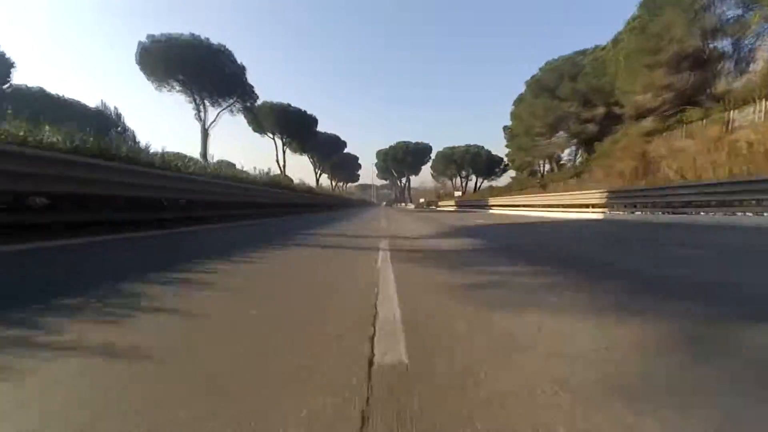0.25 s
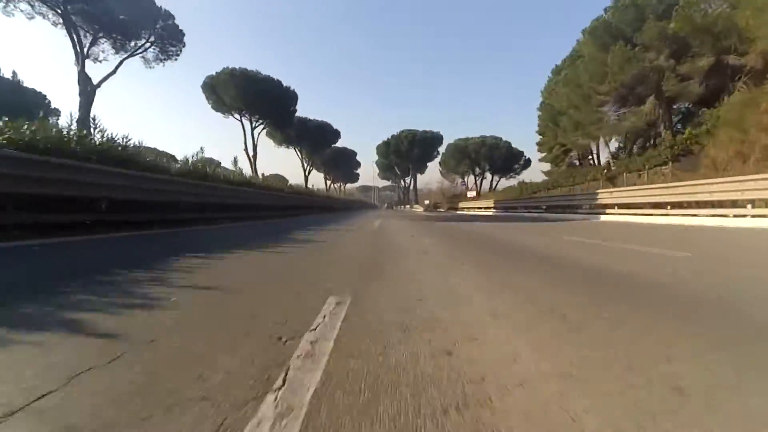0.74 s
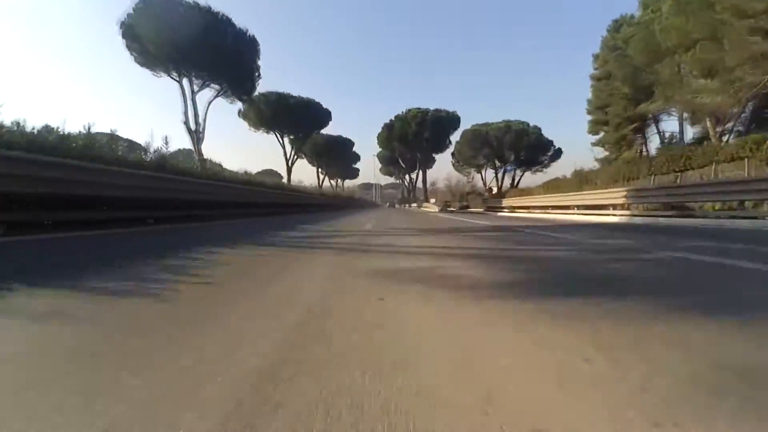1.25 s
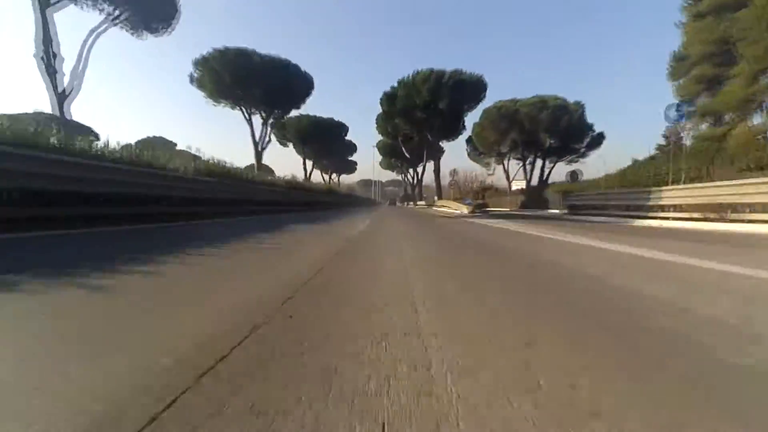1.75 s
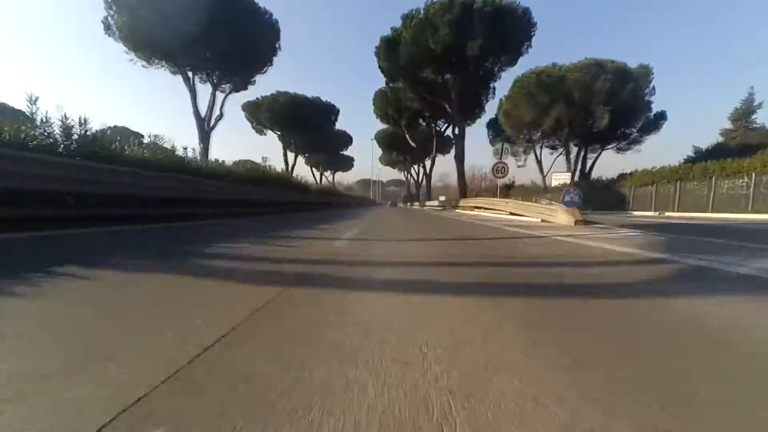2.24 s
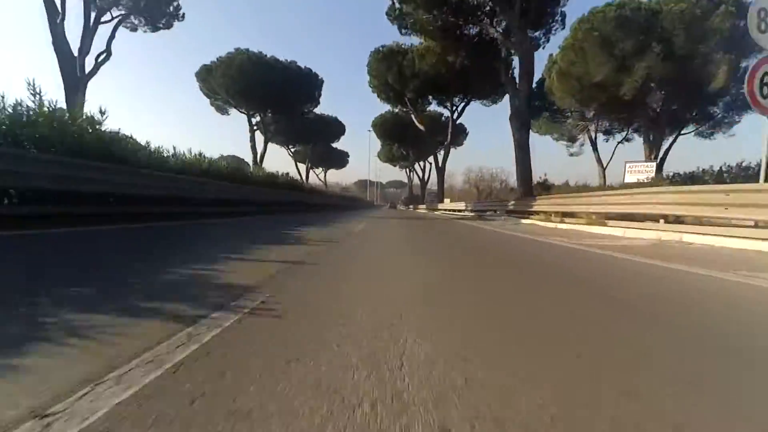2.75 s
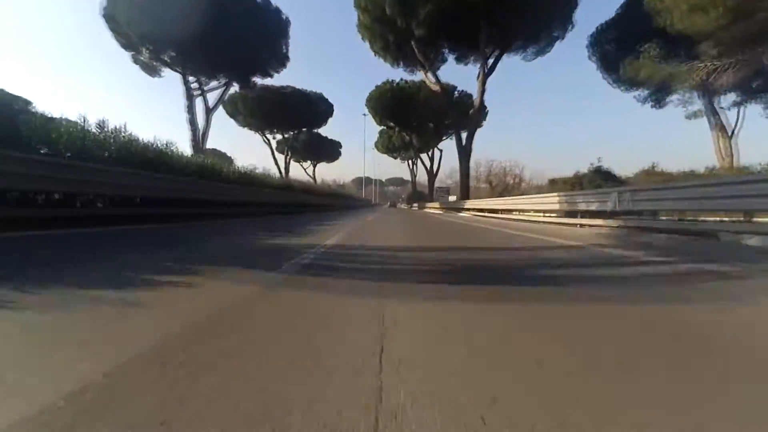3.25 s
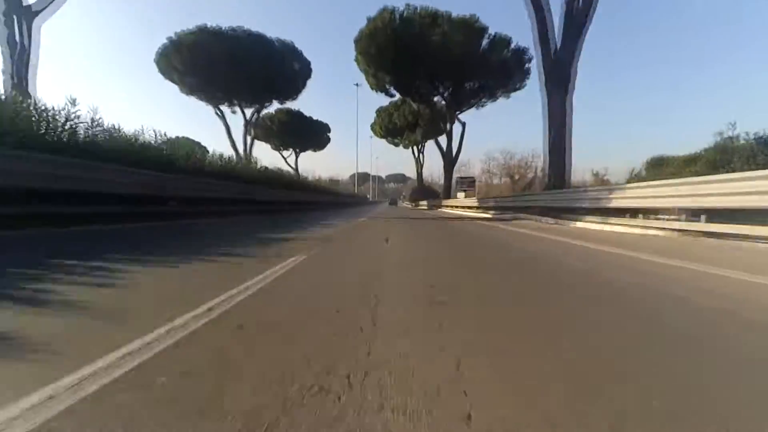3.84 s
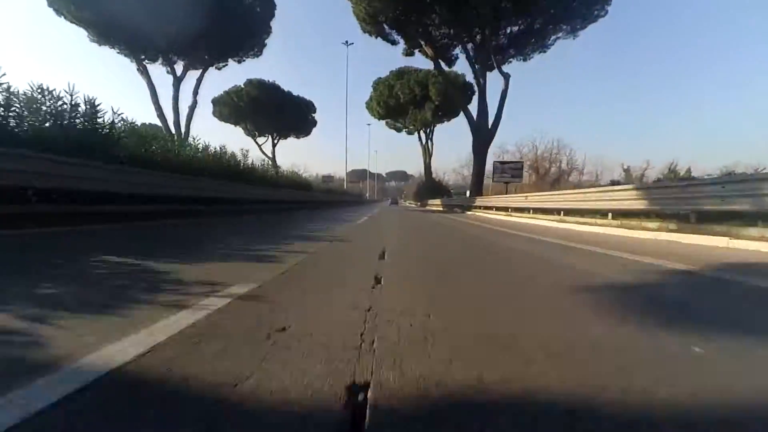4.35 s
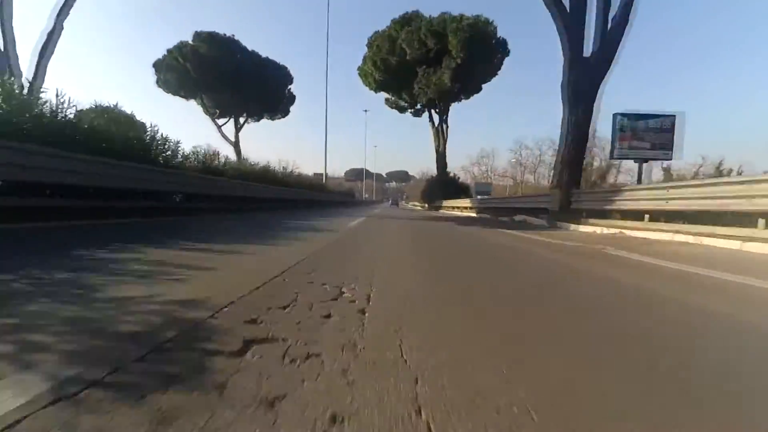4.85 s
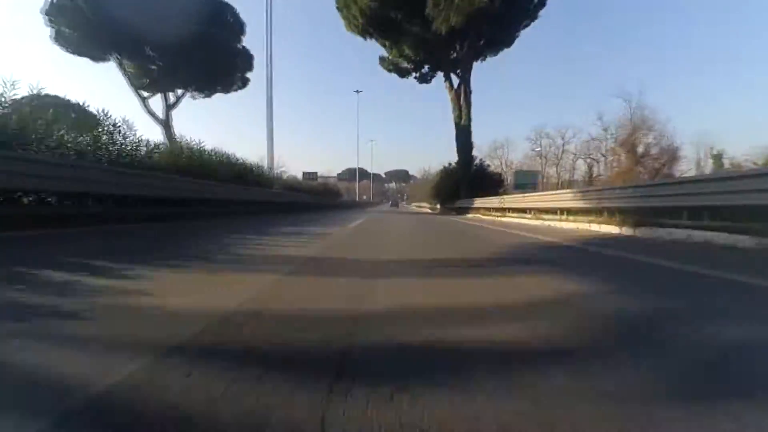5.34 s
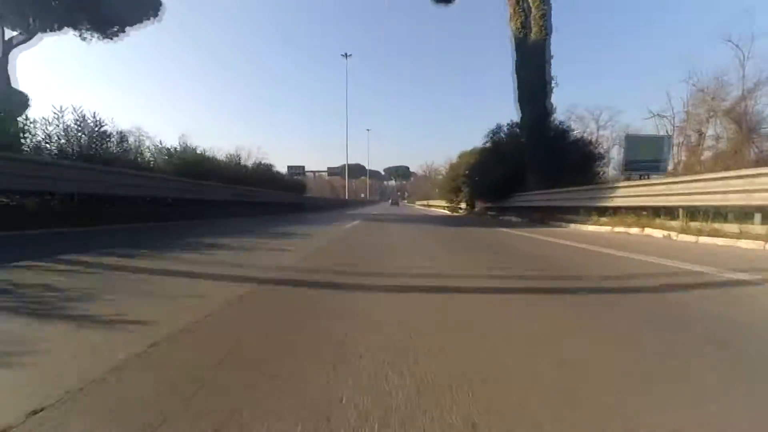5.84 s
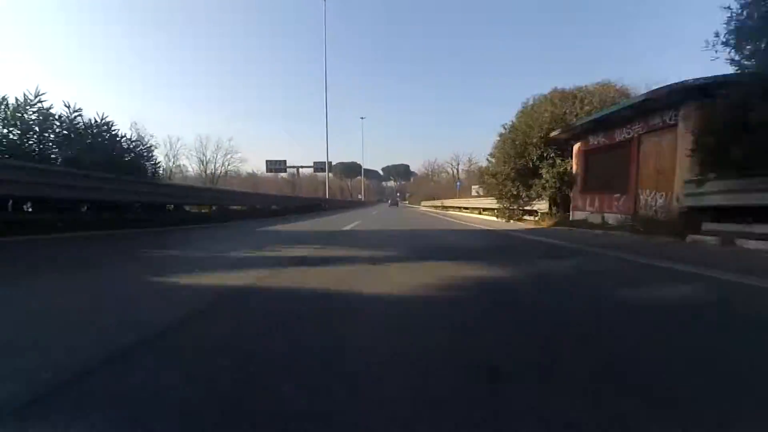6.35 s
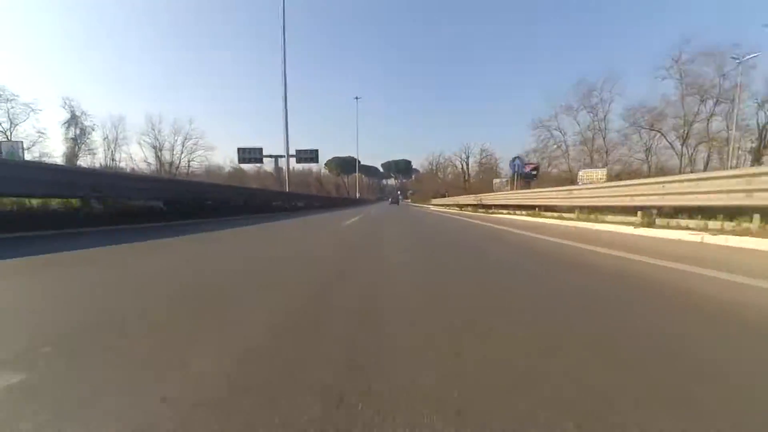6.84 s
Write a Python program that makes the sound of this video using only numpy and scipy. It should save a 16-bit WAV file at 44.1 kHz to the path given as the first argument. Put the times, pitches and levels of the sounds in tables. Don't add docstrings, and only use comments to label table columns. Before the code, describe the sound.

Front-mounted on a small car on an open road, an enclosed microphone is shaken by bass thuds and flutter that overload it. Quieter tyre noise and loose-part ticking rustle through the shell. The engine's low drone sinks gently as speed falls. Small hard knocks of grit come singly and in clusters, faint high squeaks flicker, and a wavering gear whine grows clearer towards the end.

```python
import sys
import numpy as np
from scipy import signal
from scipy.fft import rfft, irfft
from scipy.io import wavfile
from scipy.ndimage import uniform_filter1d

SR = 44100
rng = np.random.default_rng(int(sys.argv[2]) if len(sys.argv) > 2 else 0)


def amplitude_ratio(level_db):
    exponent = np.asarray(level_db, float) / 20
    return 10 ** exponent


def int16_out(signal):
    q = np.round(np.clip(np.atleast_2d(signal).T, -1, 1) * 32767)
    wavfile.write(sys.argv[1], SR, q.astype(np.int16))


N = 312651

# start in seconds, ring near 1 kHz in dB, crack in dB, top end in dB.
GRIT_KNOCKS = [(1.079, -21, -35, -58), (2.006, -22, -32, -58), (2.021, -26, -31, -57),
               (2.065, -27, -37, -55), (2.55, -30, -29, -58), (3.114, -27, -37, -61),
               (4.243, -30, -34, -63), (4.573, -25, -39, -60), (4.597, -27, -38, -61),
               (4.665, -33, -29, -54), (4.671, -31, -33, -59), (4.749, -27, -35, -62),
               (6.609, -27, -37, -62)]
# middle in seconds, length in seconds, pitch in Hz, level in dB.
RUBBING_SQUEAKS = [(0.027, 0.25, 7520, -63), (.3, .3, 7300, -69), (.55, 0.081, 7450, -72),
                   (0.922, 0.081, 7500, -72), (2.2, 0.11, 7440, -69), (2.426, .15, 7520, -68),
                   (2.777, 0.36, 7430, -67), (3.693, .06, 7450, -73), (5.271, .09, 7500, -65),
                   (5.72, 0.28, 7450, -67), (6.025, 0.13, 7520, -69), (6.633, 0.079, 7450, -74)]


def track(table):
    s, *columns = np.transpose(table)
    return [np.interp(np.arange(N) / SR, s, column) for column in columns]


def unit(x):
    return x / np.sqrt(np.mean(x ** 2))


def walk(rate_hz):
    hold = int(SR / rate_hz)
    steps = np.repeat(rng.standard_normal(N // hold + 1), hold)
    slewed = uniform_filter1d(uniform_filter1d(steps, hold), hold)
    return unit(slewed[:N])


def band(x, lo_hz, hi_hz):
    return signal.sosfilt(signal.butter(2, [lo_hz, hi_hz], "band", fs=SR, output="sos"), x)


def lowpass(x, hz):
    return signal.sosfilt(signal.butter(2, hz, fs=SR, output="sos"), x)


def split(x):
    low, below_top = lowpass(x, 1700), lowpass(x, 6500)
    return low, below_top - low, x - below_top


def housing(x):
    # frequency in Hz, gain in dB.
    colour = [(90, -50), (150, -5.5), (200, -12), (330, -15), (600, -15), (800, -14.5), (1030, -4),
              (1490, -18.5), (2800, -23), (4750, -26), (5050, -34), (8400, -43.5), (9000, -48),
              (15200, -52.5)]
    # frequency in Hz, width in Hz, gain in dB.
    ripple = [(290.7, 79, 9.5), (329.5, 108, -9), (431, 15.6, 6.5), (552, 32, 5), (625.4, 14.5, 8),
              (667, 33, -11), (744, 48, 6), (803, 24, -15), (904.3, 31, 5), (1170, 63, 2.5),
              (1368, 18, 2.5), (1470, 165, -6), (1580, 64, 6.5), (1650, 42, 3), (1846, 84, -3),
              (1895, 58, 7.5), (2020, 48, -7.5), (2248, 85, 6.5), (2320, 140, -3), (2787, 227, 9),
              (3245, 105, -11.5), (3785, 90, 4), (3810, 92, -3.5), (4260, 320, 3), (4720, 150, 4),
              (5450, 110, 6), (6200, 150, -5), (7000, 440, 1), (7420, 150, -3), (7520, 350, 3.5)]
    size = 8192
    hz = np.maximum(np.fft.rfftfreq(size, 1 / SR), 1)
    colour_hz, colour_db = np.transpose(colour)
    db = np.interp(np.log(hz), np.log(colour_hz), colour_db)
    for centre_hz, width_hz, gain_db in ripple:
        db = db + gain_db / (1 + (2 * (hz - centre_hz) / width_hz) ** 2)
    cepstrum = irfft(np.log(amplitude_ratio(db)))
    cepstrum[1:size // 2] *= 2
    cepstrum[size // 2 + 1:] = 0
    response = irfft(np.exp(rfft(cepstrum)))
    return signal.fftconvolve(x, response)[:N]


def road(t):
    # middle in seconds, length in seconds, swing in dB, deep over upper modes in dB.
    bumps = [(0.069, 0.1, -13, 11), (0.23, 0.15, -16, -1), (0.473, 0.15, -13, 6.5), (0.638, 0.11, -10, 7),
             (0.854, .2, -9, 7.5), (1.018, 0.11, -10, 4.5), (1.163, 0.12, -13, 11), (1.264, 0.042, -14, 2),
             (1.512, 0.14, -14.5, 2), (1.728, 0.17, -14, 2), (1.937, 0.18, -13.5, 0), (2.215, 0.21, -11, 6),
             (2.566, 0.151, -10.5, 6), (2.674, .06, -12.5, 15), (2.84, 0.13, -15, 13.5),
             (3.08, 0.13, -16.5, 9.5), (3.43, 0.11, -12.5, 3.5), (3.662, 0.13, -13, 12),
             (3.925, 0.087, -17.5, 8), (4.176, 0.14, -14, 4), (4.353, 0.044, -15, 9), (4.613, 0.2, -11, 7),
             (4.882, 0.15, -13, 6.5), (5.1, 0.093, -12.5, 5.5), (5.33, 0.16, -16.5, 3.5),
             (5.532, 0.13, -15, 3.5), (5.917, .16, -15, 6.5), (6.595, 0.049, -11.5, 0),
             (6.694, 0.15, -13.5, 12.5), (6.89, 0.089, -14, 6.5)]
    between_db, between_deep_db, smoothing_db_per_s = -18.5, 3.5, 0.5
    middle, length, swing_db, deep_db = np.transpose(bumps)[:, :, None]
    steps = t[::64]
    power = amplitude_ratio(2 * swing_db) * np.exp(-(2 * (steps - middle) / length) ** 2)
    between = amplitude_ratio(2 * (between_db - smoothing_db_per_s * steps))
    total = between + power.sum(axis=0)
    depth_db = (between * between_deep_db + (power * deep_db).sum(axis=0)) / total
    return np.interp(t, steps, 10 * np.log10(total)), np.interp(t, steps, depth_db)


def ring(modes, steady):
    out = 0
    for hz, width_hz, db in modes:
        noise = band(rng.standard_normal(N + SR), hz - width_hz / 2, hz + width_hz / 2)
        settled = unit(noise[SR:])
        swing = signal.hilbert(settled, 2 ** 19)[:N]
        evened = swing.real / (np.abs(swing) + 0.17) ** steady
        out = out + amplitude_ratio(db) * unit(evened)
    return unit(out)


def shake(swing_db, balance_db):
    # frequency in Hz, width in Hz, level in dB.
    deep_modes = [(16.03, 3.32, -9), (35.33, 4.93, -1.2), (42.3, 10.35, -2.5), (49.41, 5.65, -3.5)]
    upper_modes = [(64.27, 6.1, 0.1), (85.1, 4.7, -12), (106.6, 16.5, -13), (131, 28.3, -17.5),
                   (175.5, 20, -27.5)]
    deep = amplitude_ratio(balance_db / 2) * ring(deep_modes, steady=0.39)
    upper = amplitude_ratio(-0.1 - balance_db / 2) * ring(upper_modes, steady=0.44)
    x = deep + upper
    size = np.sqrt(uniform_filter1d(uniform_filter1d(x ** 2, size=1500), size=1500) + 0.1)
    x = amplitude_ratio(swing_db - 0.53) * x / size ** 0.86
    t = np.arange(N) / SR
    near_knock = sum(np.exp(-((t - s - .003) / .012) ** 4) for s, *_ in GRIT_KNOCKS)
    calm = np.clip(near_knock, 0, 1)
    return (1 - calm) * x + calm * .25 * np.tanh(x / .25)


def top_end(t):
    fall_db_per_s, per_squeak_db = 0.28, 0.5
    rubbing = sum(np.exp(-(2 * (t - s) / length) ** 2) for s, length, *_ in RUBBING_SQUEAKS)
    return per_squeak_db * rubbing - fall_db_per_s * t


def rattle(turns, top_db):
    # time in seconds, level in dB, brightness in dB.
    asphalt = [(0, -37.5, -3.5), (.16, -32, -7), (.6, -34, -4), (1.05, -31.5, -7.5), (1.4, -36, -4.5),
               (1.8, -36, -3.5), (2.1, -33, -6), (2.55, -36.5, -4), (2.8, -33.5, -7.5), (3.4, -36.5, -5.5),
               (4.0, -34.5, -7), (4.65, -37, -4.5), (5.0, -34, -7.5), (5.3, -35.5, -6.5), (6.0, -33, -7.5),
               (6.43, -33.5, -8.5), (6.7, -36.5, -5), (7.09, -33.5, -7)]
    level_db, bright_db = track(asphalt)

    strength = amplitude_ratio(6.0 * rng.standard_normal(int(turns[-1]) + 2))[turns.astype(int)]
    puff = strength * np.exp(-(turns % 1) / 0.3)

    ticks_per_s, tick_decay_s = 120, 0.00088
    hits = rng.random(N) < ticks_per_s / SR
    ticks = hits * amplitude_ratio(5.1 * np.minimum(rng.exponential(size=N), 3))
    ticks = signal.lfilter([1], [1, -np.exp(-1 / (tick_decay_s * SR))], ticks)

    flutter = amplitude_ratio(0.4 * walk(20) + 0.49 * walk(80))
    pulsing = flutter * (1 + 0.17 * unit(puff) + 0.052 * unit(ticks))
    low, middle, top = split(pulsing * rng.standard_normal(N))
    loose = amplitude_ratio(0.38 * walk(30)) * (1 + 0.1 * unit(ticks)) * amplitude_ratio(bright_db - bright_db.mean())
    x = housing(low + loose * (middle + top * amplitude_ratio(top_db - top_db.mean())))
    return x / np.std(band(x, 500, 1450)) * amplitude_ratio(level_db - 0.02)


def engine(turns, t):
    # multiple of the firing rate, level against its curve in dB, wobble in dB.
    orders = [
        (1, 2, -0.5),
        (2, -2.5, 2),
        (3, -2, 4),
        (4, -0.5, 3.5),
        (5, -15.5, 4.5),
        (8, -5, 4.5),
    ]
    hum_db = -41 + 1.18 * t
    buzz_db = -49 - 1.33 * t
    out = 0
    for multiple, db, wobble_db in orders:
        curve_db = hum_db if multiple < 3 else buzz_db
        tone = np.sin(2 * np.pi * (multiple * turns + rng.random()))
        out = out + amplitude_ratio(curve_db + db + wobble_db * walk(6)) * tone
    return np.sqrt(2) * out


def gear_whine():
    # time in seconds, pitch in Hz, level in dB.
    whine_curve = [
        (0, 660, -62),
        (1.6, 655, -74),
        (3.4, 650, -71),
        (4.0, 650, -63),
        (4.6, 639, -53.5),
        (5.8, 632, -54.5),
        (7.09, 622, -48.5),
    ]
    pitch_hz, level_db = track(whine_curve)
    phase = np.cumsum(pitch_hz * (1 + 0.0092 * walk(12))) / SR
    return np.sqrt(2) * amplitude_ratio(level_db + 4.9 * walk(14)) * np.sin(2 * np.pi * phase)


def squeak():
    t, out = np.arange(N) / SR, 0
    for s, length, hz, db in RUBBING_SQUEAKS:
        swell = np.exp(-(2 * (t - s) / length) ** 4)
        out = out + amplitude_ratio(db) * swell * unit(band(rng.standard_normal(N), hz - 90, hz + 90))
    return out * amplitude_ratio(2.6 * walk(50))


def knocks():
    out, t = np.zeros(N + SR), np.arange(2000) / SR
    for s, *levels_db in GRIT_KNOCKS:
        noise = rng.standard_normal(len(t))
        ringing = housing(noise * np.exp(-t / .002))[:len(t)]
        body = band(ringing, 800, 1400)
        crack = band(ringing, 1900, 5500) + .8 * band(ringing, 2500, 3100)
        top = band(noise * np.exp(-t / .001), 5000, 12500)
        start = int(s * SR)
        for part, db, gain_db in zip((body, crack, top), levels_db, (1.5, 6, 10)):
            out[start:start + len(t)] += amplitude_ratio(db + gain_db) * part / np.abs(part).max()
    return out[:N]


def scene():
    t = np.arange(N) / SR
    firing_hz, slowing_hz_per_s = 77.58, 1.48
    turns = np.cumsum((firing_hz - slowing_hz_per_s * t) * (1 + .004 * walk(8))) / SR
    running = engine(turns, t) + gear_whine()
    mix = shake(*road(t)) + rattle(turns, top_end(t)) + running + squeak() + knocks()
    return mix[None]


def band_limit(x):
    return signal.sosfilt(signal.butter(12, 15170, fs=SR, output="sos"), x)


def record(dry):
    full_scale = .321
    overloaded = np.clip(dry, -full_scale, full_scale)
    return band_limit(overloaded)


dry = scene()
out = record(dry)
int16_out(out)
```